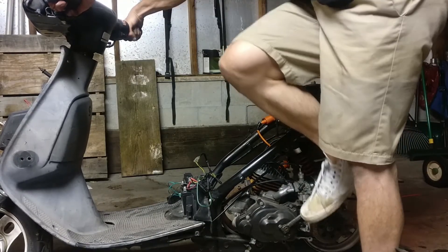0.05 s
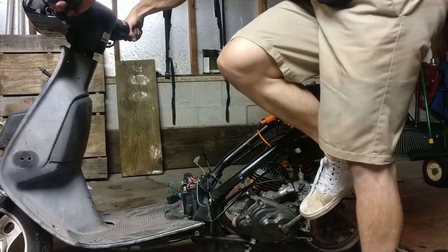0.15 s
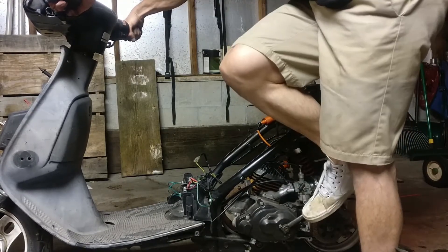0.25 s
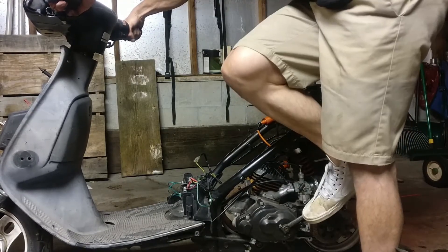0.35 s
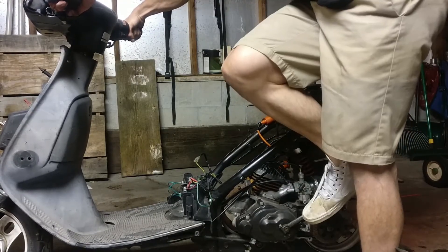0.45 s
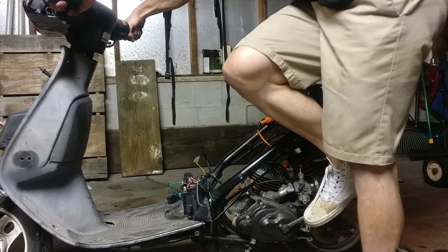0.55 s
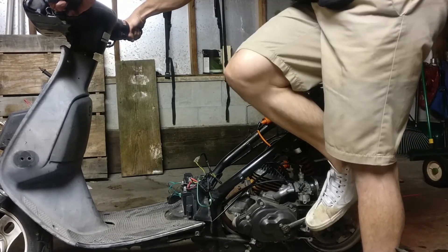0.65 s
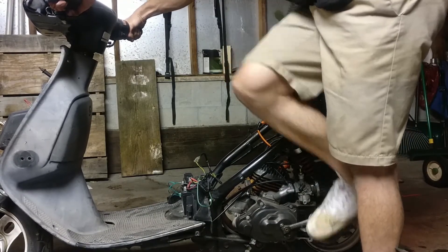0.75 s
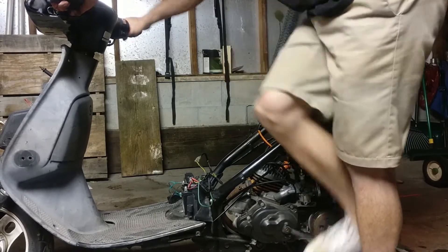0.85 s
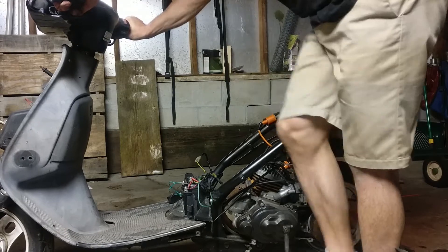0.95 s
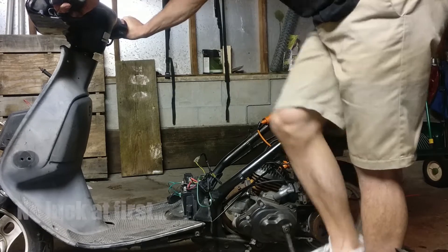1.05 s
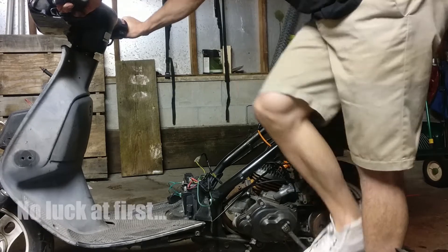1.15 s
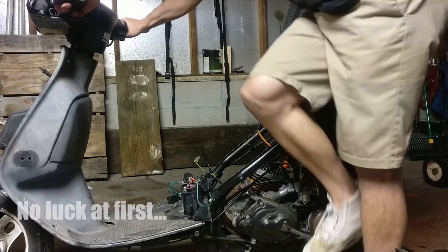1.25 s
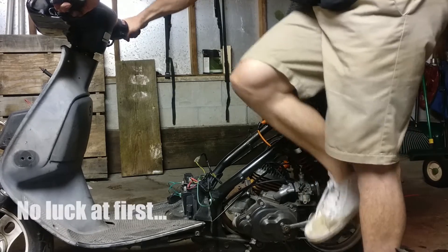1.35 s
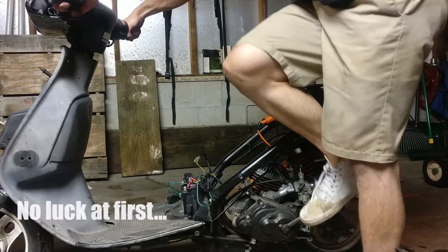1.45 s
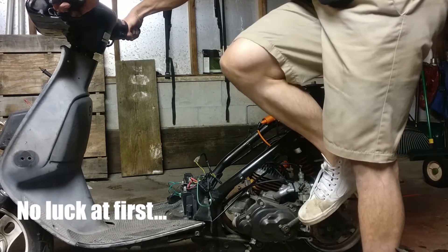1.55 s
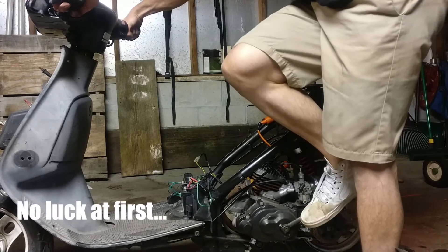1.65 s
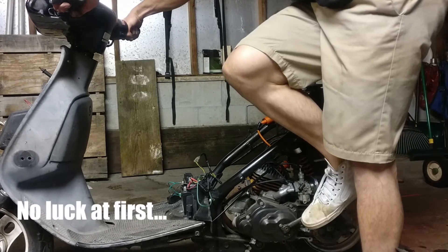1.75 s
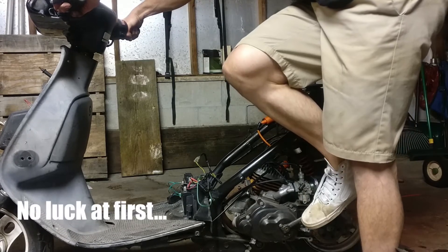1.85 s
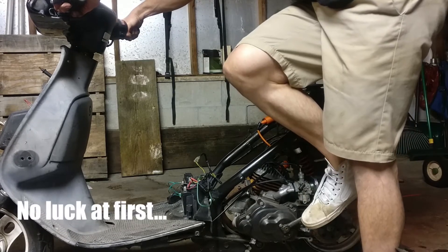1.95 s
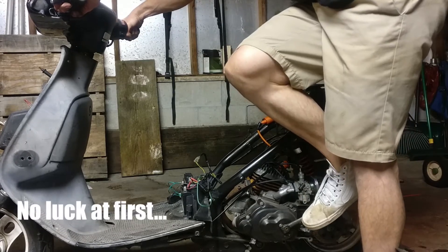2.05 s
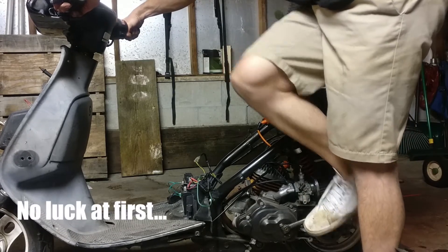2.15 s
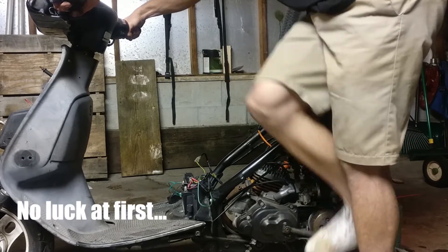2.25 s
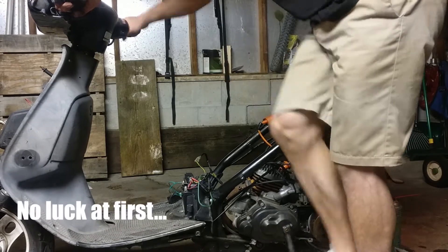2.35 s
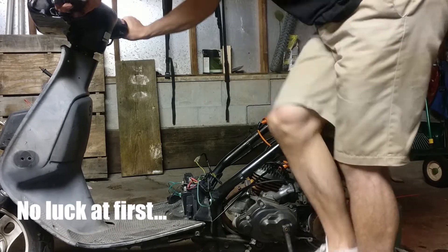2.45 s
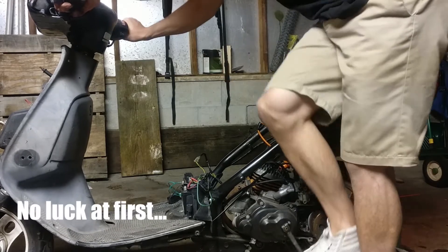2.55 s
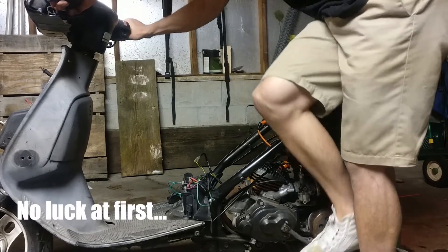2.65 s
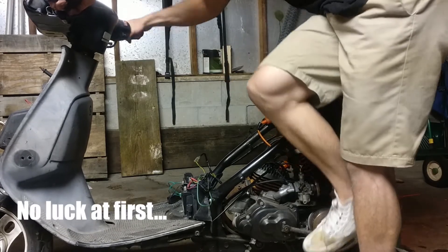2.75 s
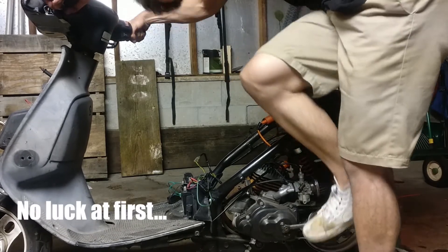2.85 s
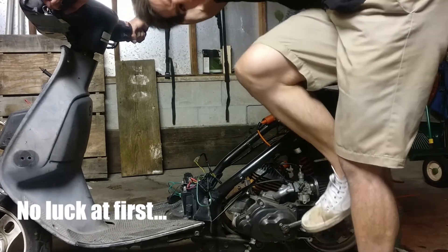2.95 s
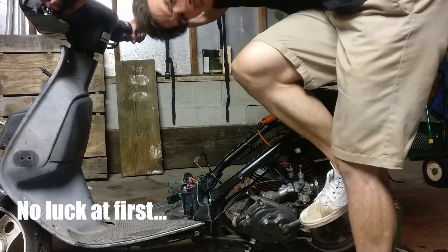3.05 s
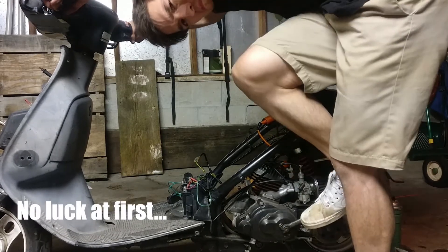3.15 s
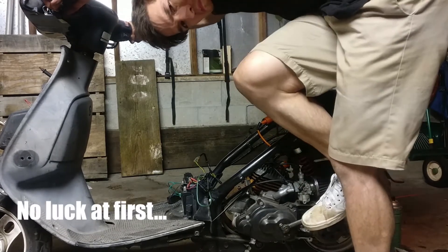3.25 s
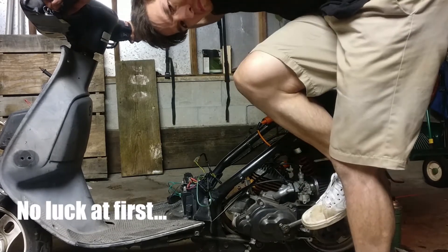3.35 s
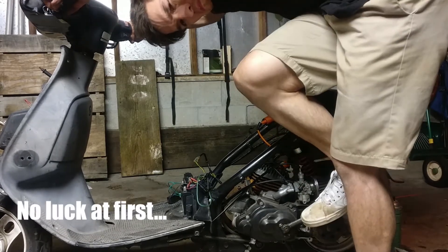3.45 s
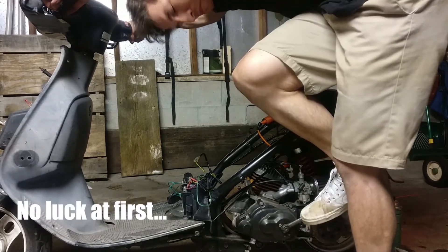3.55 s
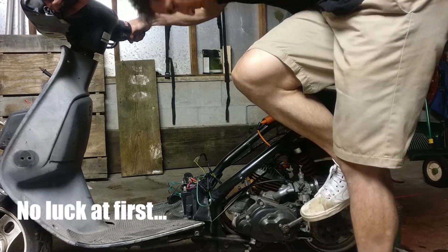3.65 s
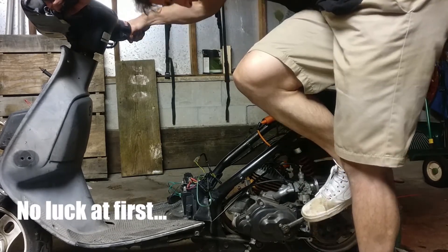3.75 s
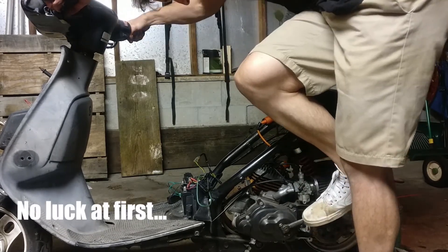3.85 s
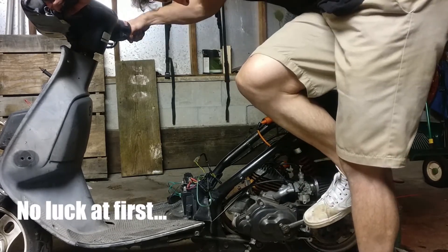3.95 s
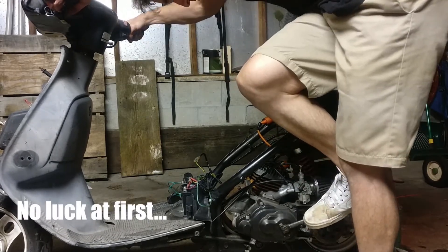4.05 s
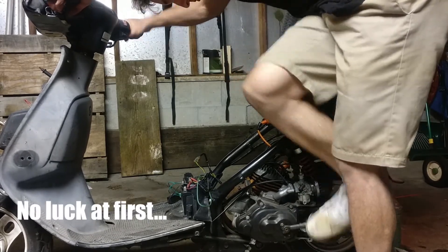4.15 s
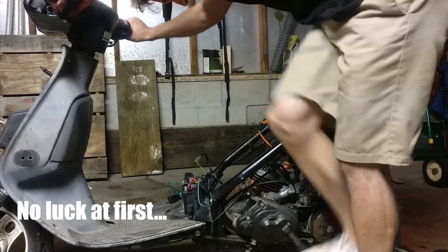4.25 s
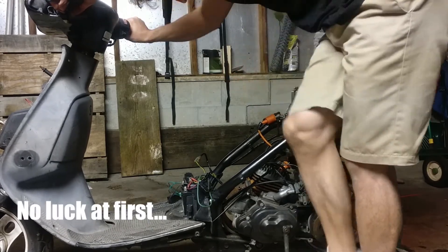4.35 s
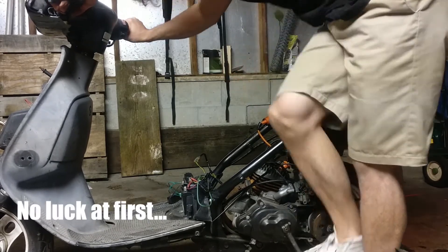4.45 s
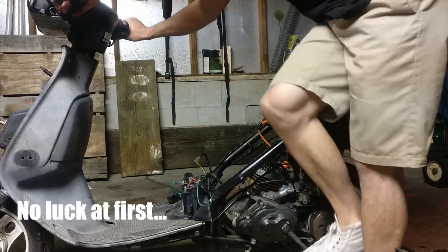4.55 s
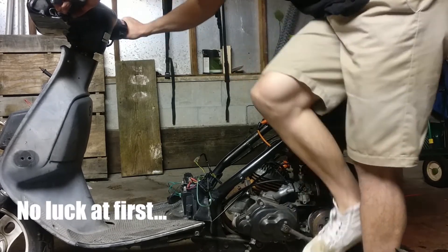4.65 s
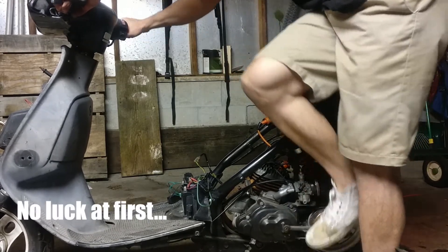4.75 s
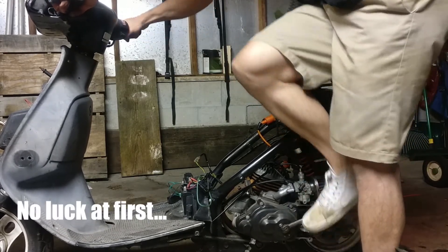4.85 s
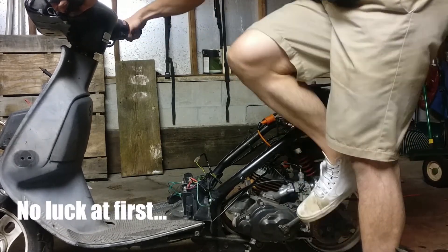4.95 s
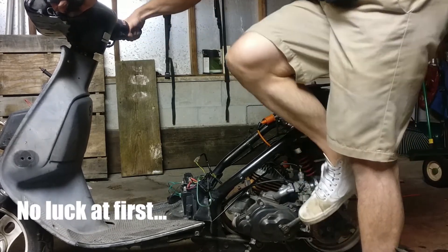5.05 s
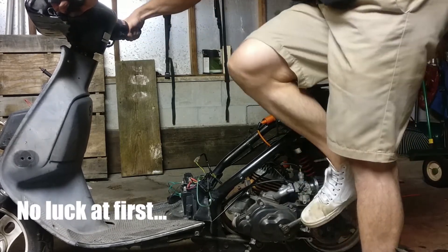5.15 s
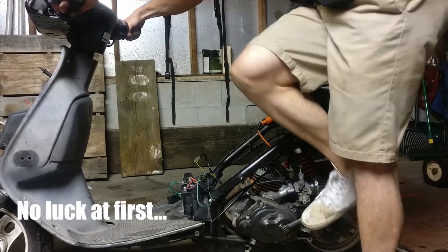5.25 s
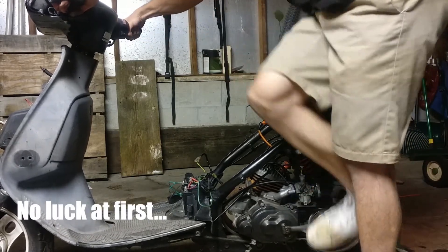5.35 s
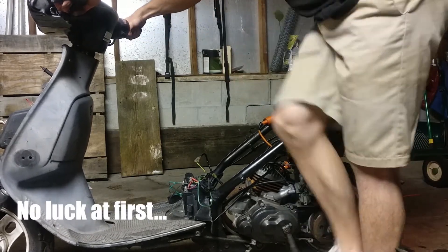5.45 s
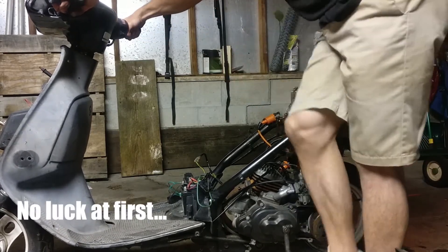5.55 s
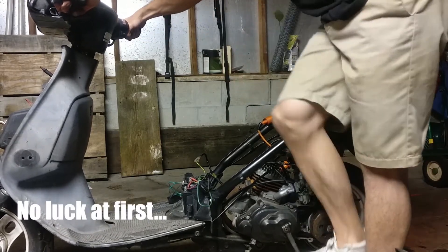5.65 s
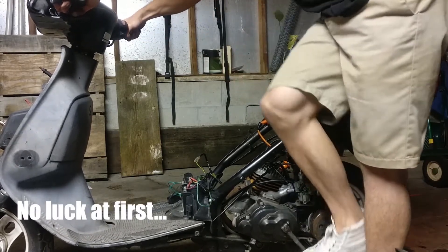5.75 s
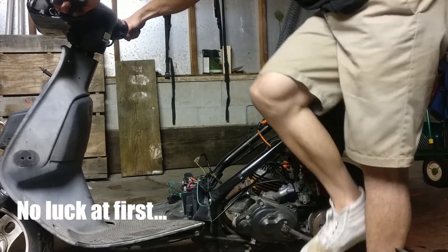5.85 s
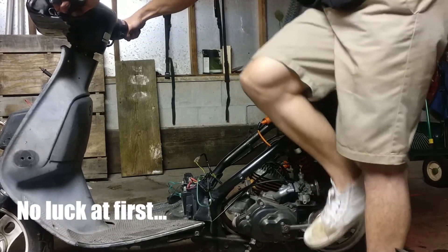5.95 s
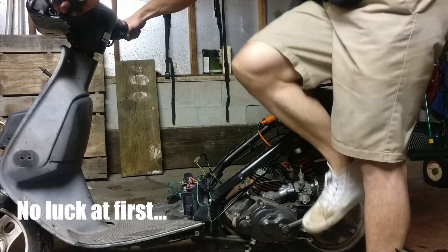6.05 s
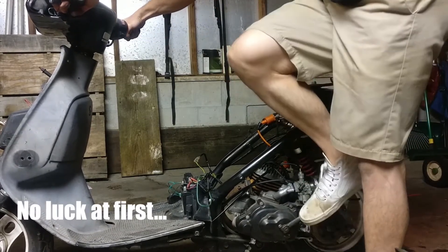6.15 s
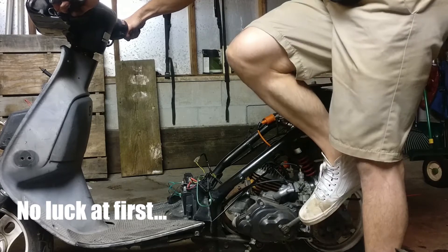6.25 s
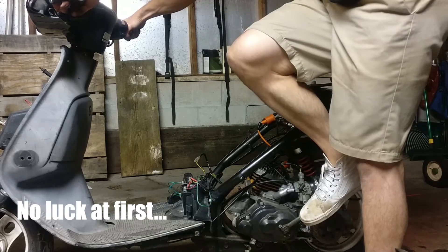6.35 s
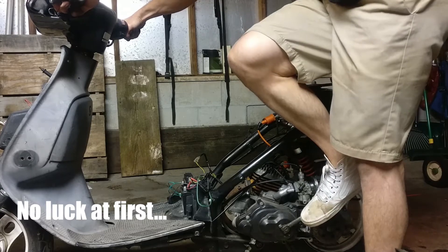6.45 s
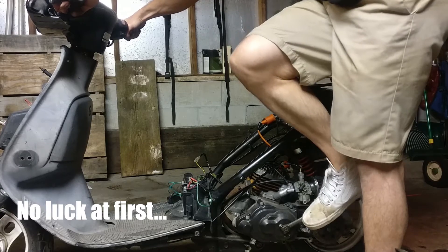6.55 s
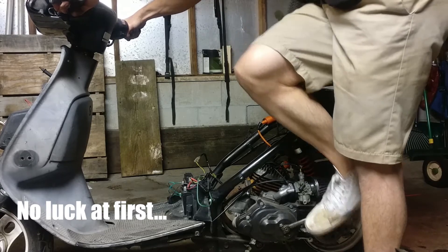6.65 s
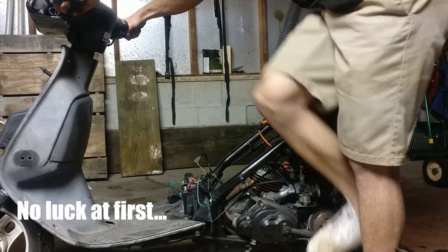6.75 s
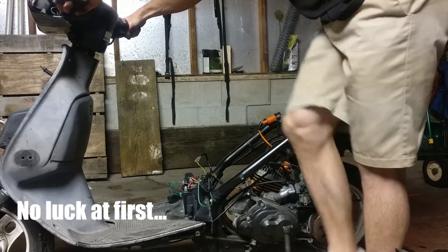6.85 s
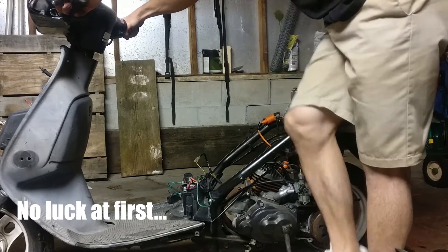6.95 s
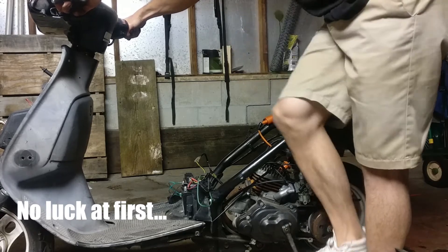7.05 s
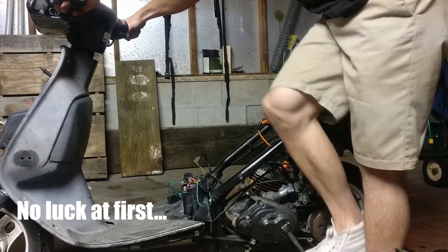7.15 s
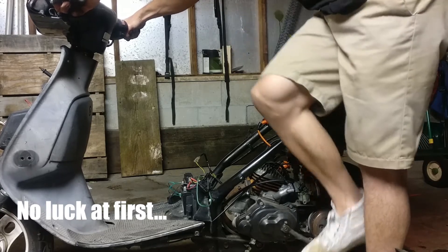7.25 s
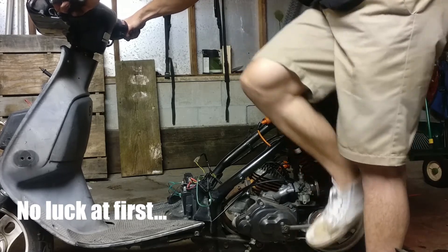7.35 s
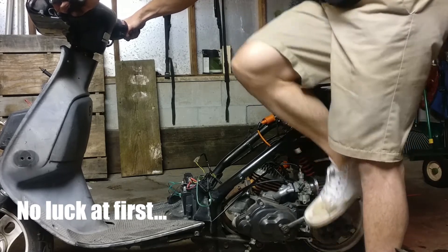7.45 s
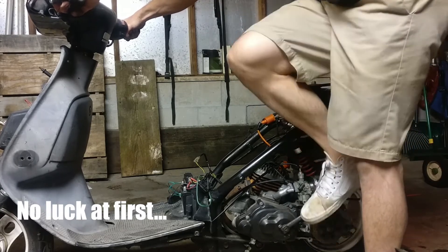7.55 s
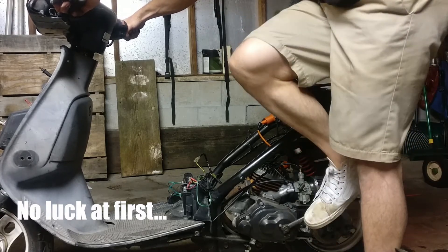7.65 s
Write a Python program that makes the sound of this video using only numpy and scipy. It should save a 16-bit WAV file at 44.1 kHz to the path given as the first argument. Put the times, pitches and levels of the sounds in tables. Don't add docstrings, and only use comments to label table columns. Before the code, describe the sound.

In a block-walled garage, a small scooter is kick-started close to a phone, metal brighter on the left. Low traffic rumble and soft room hush lie underneath. Small pawl clicks and clacks open the scene as the lever is set, with another at 0.65 s. The first kick bites at 0.76: gritty gear scrape, clattering backlash, two deep muffler booms, then a loud clack at 0.97 and a ringing spin-down with a weaker puff. Ratchet ticks and thin spring squeaks follow as the lever rises near 1.3. A sharp clack at 2.1 precedes the second kick at 2.2. From 2.9 to 3.9 it is quiet, with only faint fumbling clicks. Further kicks come at 4.2, 5.3 and 6.7, each scraping, thumping and clacking to a stop without catching. Creaks and strong ratchet clicks follow around 7.3; a hard double clack ends it at 7.64.

```python
import sys
import numpy as np
from scipy import signal
from scipy.fft import rfft, irfft, next_fast_len
from scipy.io import wavfile
from scipy.ndimage import uniform_filter1d, map_coordinates

SR = 44100
rng = np.random.default_rng(int(sys.argv[2]) if len(sys.argv) > 2 else 0)


def gain_from_db(level_db):
    decades = np.asarray(level_db, float) / 20
    return 10 ** decades


def generate_wav(sig):
    pcm = np.round(np.clip(np.atleast_2d(sig).T, -1, 1) * 32767).astype(np.int16)
    wavfile.write(sys.argv[1], SR, pcm)


N = 339129

# hz, width_hz, level_db
CASE_MODES = [(516, 470, 2), (666, 450, 8.5), (1129.7, 40, 17), (1244, 504, 9), (1760, 1400, -3.5)]
# start_s, peak_db, knock_db, down_load_db, case_shake_db
BITES = [
    (0.7633, -21, -7.5, 0, -1),
    (2.2046, -24, -16, 1, -2.5),
    (4.1812, -22.5, -11.5, 1, -1),
    (5.3251, -20, -6, -0.5, -3),
    (6.736, -21.5, -9.5, 1.5, -5.5),
]
# start_s, peak_db, rattle_db, coasting_db, braking_factor
STOPS = [
    (0.9668, -16, -4.5, -0.5, 0.96),
    (2.4034, -21, -1.5, -0.5, 0.86),
    (4.372, -18.5, -12, -1.5, 1.06),
    (5.564, -21.5, -10.5, -7.5, 0.78),
    (6.9155, -15, -3, 1, 0.78),
]


def unit(x):
    return x / np.sqrt(np.mean(x ** 2) + 1e-20)


def along(points, hz):
    f, v = np.transpose(points)
    return np.interp(np.log(hz + 1), np.log(f + 1), v)


def curves(rows):
    s, *cols = np.transpose(rows)
    return [np.interp(np.arange(N) / SR, s, c) for c in cols]


def wobble(rate_hz):
    knots = rng.standard_normal(int(N * rate_hz / SR) + 4)
    return map_coordinates(knots, [np.arange(N) * rate_hz / SR])


def filtered(x, response):
    m = next_fast_len(x.shape[-1] + 4096)
    return irfft(rfft(x, m) * response(np.fft.rfftfreq(m, 1 / SR)), m)[..., :x.shape[-1]]


def body(x, modes):
    def response(f):
        total = 0
        for k, (hz, width_hz, db) in enumerate(modes):
            damping = 1j * f * width_hz
            total = total + (-1) ** k * gain_from_db(db) * damping / (hz * hz - f * f + damping)
        return total
    return filtered(x, response)


def coloured(x, spectrum):
    return unit(filtered(x, lambda hz: gain_from_db(along(spectrum, hz))))


def clacks():
    # hz, width_hz, level_db
    steel_modes = [(2536, 410, 0.5), (3090, 800, 0.5), (4042, 420, -1), (4336, 173, 1), (4764, 250, -2),
                   (2680, 383, 2.5), (4704, 670, -9)]
    steel_low_hz, steel_top_hz, snap_hz = 1630, 5460, 7600
    out, t = np.zeros((2, N + SR)), np.arange(SR // 6) / SR
    chatter_t60_s = np.array([[[.012], [.045]], [[.018], [.035]], [[.05], [.09]]])
    steel_only = np.array([[[1]], [[0]], [[0]]])
    rattling = gain_from_db(-60 * t / np.array([[.2], [.35], [.3]]))
    touch = 1 + 1.18 * np.exp(-t / .002)
    wide = np.array([[1], [3.4], [3.4]])
    modes = steel_modes
    for s, db, bright_db, knock_db, upper_db, rattle_db, tooth, away_db, hold_s in contacts():
        fading = gain_from_db(-60 * np.maximum(t - hold_s * steel_only, 0) / chatter_t60_s)
        chatter = rng.standard_normal((3, 2, len(t))) * fading * touch
        chatter[0, 0, 0] += 6.7
        rattle = gain_from_db(rattle_db) * rattling * rng.standard_normal((3, len(t)))
        struck = []
        for hz, width_hz, level_db in modes:
            detune, level_scatter_db = rng.standard_normal(2)
            mode_db = level_db + level_scatter_db + (upper_db + 9.0) * (hz > 3000)
            struck.append((hz * np.exp(detune / 60), width_hz * wide, mode_db))
        ordered = sorted(struck + tooth, key=lambda mode: mode[0])
        steel = body(np.vstack([chatter[0], rattle[:1]]), ordered)
        steel = filtered(steel[:2] + steel[2],
                         lambda hz: (hz / (hz - 1j * steel_low_hz)) ** 4 / (1 + 1j * hz / steel_top_hz) ** 2)
        snap = filtered(chatter[1] + rattle[1], lambda hz: (hz / (hz - 1j * snap_hz)) ** 3)
        knock = body(chatter[2] + rattle[2], CASE_MODES)
        parts = zip((steel, snap, knock), (1.5, bright_db + 13, knock_db + 3.5))
        clack = sum(gain_from_db(db + rel_db) * p / np.abs(p[0]).max() for p, rel_db in parts)
        out[:, round(s * SR):][:, :len(t)] += gain_from_db([[0], [away_db]]) * clack
    return out[:, :N]


def contacts():
    # start_s, peak_db, bright_db
    slaps = [(0.839, -26, -20), (0.849, -24, -26), (0.889, -24, -22), (0.9148, -22.5, -20),
             (1.004, -19, -36), (1.131, -22.5, -31.5), (2.2257, -27.5, -13), (2.2514, -22.5, -8),
             (2.2829, -20.5, -13), (2.316, -30, -21), (2.3349, -21.5, -7), (2.3746, -21.5, -18),
             (2.392, -28, -17), (2.5731, -33, -30), (4.23, -25.5, -27), (4.238, -35, -25),
             (4.263, -26, -20), (4.2807, -29, -8), (4.3047, -21.5, -9), (4.311, -27, -10),
             (4.346, -19, -12.5), (5.383, -36, -25), (5.3936, -27, -6), (5.4059, -23, -19),
             (5.4415, -24, -20), (5.449, -24, -13), (5.482, -20.5, -15), (5.509, -25.5, -12),
             (5.578, -23, -25), (5.692, -29.5, -25), (6.785, -37, -15), (6.812, -27.5, -14),
             (6.8271, -24, -12), (6.88, -23.5, -11.5), (6.906, -37, -20)]
    # start_s, peak_db, tooth_hz, bright_db
    ratchet = [(1.233, -34, 4700, -38), (1.262, -32.5, 5140, -46), (1.2836, -28.5, 3060, -44),
               (1.303, -32, 5270, -18), (1.32, -30, 3210, -40), (1.3488, -28.5, 3950, -47),
               (1.414, -43, 2940, -34), (2.6737, -28, 2680, -34), (2.746, -39, 2530, -40),
               (2.7848, -38.5, 2600, -38), (2.796, -44.5, 4460, -7), (2.871, -45, 4110, -30),
               (2.9125, -60, 3300, -23), (4.143, -49, 4640, -3), (4.6417, -37, 2640, -40),
               (4.6738, -35, 2570, -23), (4.713, -34.5, 4240, -47), (4.744, -33, 2740, -43),
               (4.77, -33.5, 3380, -38), (4.798, -33.5, 4000, -28), (4.8255, -33.5, 2630, -43),
               (5.807, -41, 4130, -40), (5.852, -37, 4230, -38.5), (5.862, -48, 3300, -25),
               (5.879, -31.5, 5460, -35), (5.905, -33.5, 3800, -38), (5.93, -42, 3100, -40),
               (5.9527, -37, 3500, -40), (5.983, -46, 3620, -33), (6.106, -46, 2900, -49),
               (7.181, -36, 2960, -30), (7.223, -29.5, 3000, -42), (7.262, -22.5, 3100, -36),
               (7.292, -33, 4550, -39), (7.3192, -21, 3100, -24), (7.363, -28, 3450, -24),
               (7.4142, -36, 3700, -40), (7.4857, -42, 3480, -42)]
    # start_s, peak_db, bright_db, knock_db, rattle_db
    seats = [(0.06, -31.5, -22, -14.5, 6), (0.2327, -21.5, -26, -13.5, -34),
             (0.6506, -22.5, -24, -19.5, -5.5), (1.599, -24.5, -33, -19, -4.5),
             (2.1069, -15.5, -29, -42, -13.5), (3.8527, -28.5, -36, -10.5, -32), (3.927, -24, -29, -28, -9),
             (5.1128, -18.5, -30, -14.5, -33), (5.1588, -22, -26, -13.5, -40),
             (6.553, -26.5, -38, -11.5, -33), (6.587, -23.5, -25, -16, -25), (7.6353, -16.5, -21, -22, -9),
             (7.6478, -20, -20, -29, -25)]
    # start_s, peak_db, bright_db, knock_db
    feeling = [(0.071, -44.5, 1.5, -23), (0.198, -40, -30, -20), (0.215, -32, -4, -23),
               (0.6013, -45, -30, -8), (1.5637, -39, -36, -30), (1.5792, -30, -6.5, -43),
               (2.085, -37.5, -38, -35), (3.148, -44, -18, -25), (3.1625, -35.5, -7, -14),
               (3.2183, -41, -31, -3.5), (3.3962, -41, -31, -21), (3.4171, -42, -2.5, -14),
               (3.4798, -49, -26, -1), (3.578, -58, 0, -20), (3.7632, -37, -37, -33),
               (3.779, -37.5, -5.5, -14), (5.068, -35, -5, -33), (6.418, -45, 0, -12),
               (7.593, -30.5, -31, -18), (7.6049, -28.5, -7, -12)]
    brief_s, hold_s = 0.0028, 0.0049
    seat_away_db = -2

    def scatter(*colour_db):
        return np.array(colour_db) + rng.standard_normal(len(colour_db))

    rows = []
    for row in slaps:
        rows.append((*row, *scatter(-11.5, -21.5, -10), [], 0, brief_s))
    for s, db, hz, bright_db in ratchet:
        tooth = [(hz, 420, -2.5)]
        rows.append((s, db, bright_db, *scatter(-11, -22.5, -6), tooth, -4.5, brief_s))
    for s, db, knock_db, *_ in BITES:
        rows.append((s, db, -13.5, knock_db, -21.5, -24, [], 0, brief_s))
    for s, db, rattle_db, *_ in STOPS:
        rows.append((s, db, -6.5, -17, -2, rattle_db, [], 0, hold_s))
    for *row, rattle_db in seats:
        rows.append((*row, -23, rattle_db, [], seat_away_db, hold_s))
    for row in feeling:
        rows.append((*row, -24, -39, [], seat_away_db, brief_s))
    return rows


def spin():
    # hz, width_hz, level_db
    cover_modes = [(1546, 950, -5.5), (2510, 290, 1), (3100, 178, 1), (3800, 860, -1.5), (4240, 900, -2),
                   (5320, 760, -4), (5620, 4500, -15)]
    # hz, width_hz, level_db
    frame_modes = [(159, 114, -2.5), (186, 14, 8.5), (242.7, 5.5, -3), (318.2, 75, -7.5), (400, 77, -11.5),
                   (620, 240, -9)]
    # hz, density_db
    air_spectrum = [(3240, 15.5), (5500, 7), (7730, 4), (14500, 13.5), (16100, 10.5), (16300, -17),
                    (16500, -53)]
    # middle_s, half_length_s, level_db
    compression = [(0.88, 0.023, 7.5), (0.953, 0.014, -5), (1.167, 0.039, 13), (2.47, 0.044, 1),
                   (2.605, 0.062, -6), (4.214, 0.024, -4), (4.45, 0.098, 0.5), (4.591, 0.041, -21),
                   (5.36, 0.031, -21), (5.45, 0.12, 9.5), (5.73, 0.064, 10.5), (6.903, 0.016, -13),
                   (7.11, 0.076, 9)]
    gear_db = effort_db(-43.5, -31, -28, 0.058, 176, 0, (0, 0))
    case_db = effort_db(-48, -48.5, -37, 0.022, 140, 0.47, (0.48, 0))
    air_db = effort_db(-45.5, -53, -45, 0.13, 240, -13.5, (0, 1))
    thrum_db = effort_db(-42, -31.5, -35, 0.084, 160, -3, (1, 0))
    t = np.arange(N) / SR
    pressure_db = sum(db * np.exp(-((t - s) / half_s) ** 2) for s, half_s, db in compression)
    shake = np.tanh(wobble(35)) + 1.13 * wobble(13)

    meshing = unit(body(grit(2500, spread_db=3, smooth=0.56, patchy_db=3.0), cover_modes))
    gears = gain_from_db(gear_db - 2.5 + 0.56 * shake) * teeth(330, 0.014, 1.76) * meshing
    rubbing = unit(body(grit(900, spread_db=10.5, smooth=0.79, patchy_db=3.0), CASE_MODES))
    case = gain_from_db(case_db + 2.0 + 0.72 * wobble(25)) * rubbing
    leak = coloured(grit(4000, spread_db=4, smooth=0.64, patchy_db=4), air_spectrum)
    air = gain_from_db(air_db + pressure_db + 3.0 + shake) * teeth(270, 0.016, 1.3) * leak
    shaking = unit(body(rng.standard_normal(N), frame_modes))
    thrum = gain_from_db(thrum_db + 1.0 + 3.05 * wobble(20)) * shaking
    return gears + case + air + thrum


def effort_db(bite_db, down_db, jolt_db, hold_s, fall_db_per_s, drag_db, feels):
    # middle_s, half_length_s, scrape_db, case_weight_db, hiss_db
    drags = [(0.0, 0.11, -57, -3, -10), (0.09, 0.021, -46, -9, -9), (0.27, 0.022, -64, -9, -15),
             (0.2, 0.099, -57, -10, -13), (1.301, 0.12, -45.5, -5.5, -3), (1.66, 0.037, -65, 1, 2),
             (2.14, 0.032, -44.5, -6, -13), (2.68, 0.08, -47.5, -4.5, 5), (2.82, 0.032, -57.5, 12, 11),
             (2.925, 0.028, -60.5, 1, 23.5), (3.97, 0.03, -72, -14, 0), (3.902, 0.63, -67, -2, -7),
             (4.75, 0.11, -50, -2.5, 0), (5.167, 0.1, -66.5, 10.5, -10), (5.92, 0.091, -44.5, -21, -3),
             (6.2, 0.2, -81, 10, -7), (6.62, 0.12, -65.5, 4, -4), (7.35, 0.1, -42.5, -10.5, -15),
             (7.68, 0.044, -38, -11.5, -15)]
    t, take_up_s = np.arange(N) / SR, 0.018
    gain = gain_from_db(drag_db) * swells(drags, feels) + 1e-6
    for (bite_s, _, _, load_db, case_db), (stop_s, _, _, coast_db, braking) in zip(BITES, STOPS):
        down = np.interp(t, [bite_s, stop_s], [bite_db, down_db]) + load_db
        after = jolt_db + coast_db - braking * fall_db_per_s * np.maximum(t - stop_s - hold_s, 0)
        level_db = np.where(t < stop_s, down, after) + feels[0] * case_db
        gain = gain + gain_from_db(level_db) * np.clip((t - bite_s) / take_up_s, 0, 1)
    return 20 * np.log10(gain)


def swells(rows, feels):
    t, gain = np.arange(N) / SR, 0
    for s, half_s, db, *extra_db in rows:
        gain = gain + gain_from_db(db + np.dot(feels, extra_db)) * np.exp(-((t - s) / half_s) ** 2)
    return gain


def grit(rate_hz, spread_db, smooth, patchy_db):
    size_db = spread_db * np.minimum(rng.exponential(size=N), 3)
    ticks = (rng.random(N) < rate_hz / SR) * gain_from_db(size_db) * rng.choice([-1, 1], N)
    z = signal.stft(unit(ticks) + smooth * rng.standard_normal(N), nperseg=256)[2]
    field = uniform_filter1d(rng.standard_normal(z.shape), size=3, axis=0)
    field = uniform_filter1d(field, size=6, axis=1)
    return signal.istft(z * gain_from_db(patchy_db * unit(field)), nperseg=256)[1][:N]


def teeth(rate_hz, t60_s, depth):
    strokes = (rng.random(N) < rate_hz / SR) * gain_from_db(4 * np.tanh(rng.standard_normal(N)))
    decay = gain_from_db(-60 * np.arange(SR // 20) / SR / t60_s)
    return unit(1 + depth * signal.fftconvolve(strokes, decay)[:N])


def exhaust():
    # start_s, peak_db, bark_db, bark_hz
    puffs = [(0.856, -10.5, 0.5, 186), (0.927, -13, -2, 216.3), (1.032, -16, -2, 223),
             (1.177, -30, -8, 260), (2.307, -9, -12, 173), (2.39, -14, -1, 174.4), (2.478, -37, -17, 193),
             (2.546, -26.5, 4.5, 234.5), (4.287, -10, -0.5, 186), (4.359, -13.5, 0, 173.5),
             (4.438, -25, -3, 264), (4.52, -22, 1.5, 223), (5.41, -9.5, -13, 186), (5.497, -11, -9.5, 186),
             (5.598, -17, -15, 186), (5.751, -42, -2, 186), (6.822, -8, -14, 186), (6.888, -11, -12, 184),
             (6.99, -14, -34, 194), (7.131, -23, -31, 190)]
    # hz, width_hz, level_db
    pipe_modes = [(186, 6.4, 18), (240, 6.2, -5), (386, 11, -1.5), (665, 250, -13.5)]
    boom_hz, rise_s = 90, .019
    out, t = np.zeros(N + SR), np.arange(SR // 3) / SR

    def ring(ratio, t60_s):
        return gain_from_db(-60 * t / t60_s) * np.sin(2 * np.pi * ratio * boom_hz * t)

    boom = t / rise_s * np.exp(1 - t / rise_s) * np.sin(2 * np.pi * boom_hz * t)
    boom += .1 * ring(.87, .35) + .12 * ring(1.17, .45)
    pulse = t / .001 * np.exp(-t / 0.0022)
    for s, db, bark_db, bark_hz in puffs:
        bark = body(pulse, [(bark_hz, 14, 0), (bark_hz * 1.023, 60, -5)] + pipe_modes[2:])
        out[round(s * SR):][:len(t)] += gain_from_db(db - 1.0) * (boom + gain_from_db(bark_db) * bark / np.abs(bark).max())
    return out[:N]


def creak():
    # middle_s, half_length_s, level_db, pitch_hz
    squeaks = [(1.227, 0.013, -42, 1756), (1.302, 0.013, -34, 1770), (1.346, 0.033, -40, 1717),
               (5.875, 0.012, -39, 1750), (5.908, 0.0053, -35, 1790), (5.93, 0.018, -45, 1760),
               (5.975, 0.017, -38.5, 1792), (6.02, 0.011, -44.5, 1836), (6.065, 0.013, -58.5, 1780),
               (7.293, 0.022, -39.5, 1660), (7.357, 0.036, -36.5, 1780), (7.403, 0.029, -39, 1730),
               (7.465, 0.023, -57, 1760)]
    # middle_s, level_db, length_s
    shell = [
        (1.014, -32.5, 0.087),
        (2.448, -26, 0.052),
        (2.568, -40, 0.08),
        (4.442, -40.5, 0.055),
        (5.547, -28, 0.03),
        (6.965, -31, 0.057),
    ]
    # middle_s, half_length_s, level_db, pitch_hz, width_hz
    groans = [(0.145, 0.044, -47.5, 576, 100), (0.271, 0.047, -44.5, 1395, 62),
              (0.274, 0.043, -51.5, 716, 120), (.33, 0.02, -56, 1420, 100), (1.002, 0.19, -38.5, 256, 11),
              (1.18, 0.041, -43, 1163, 18), (1.624, 0.032, -48, 1380, 82), (1.63, 0.033, -51.5, 503, 79),
              (1.688, 0.023, -58, 1330, 79), (2.75, 0.039, -50, 610, 140), (2.956, 0.036, -48, 246, 22),
              (4.421, 0.17, -33, 244.9, 11), (4.719, 0.063, -54, 235, 9.4),
              (5.148, 0.026, -39.5, 1104, 100), (5.363, 0.036, -38, 694, 170), (5.482, 0.029, -30, 577, 61),
              (5.542, 0.028, -50, 600, 100), (5.937, 0.025, -49, 690, 47), (6.002, 0.19, -56.5, 500, 53),
              (6.868, 0.024, -33.5, 620, 190), (7.236, 0.046, -44.5, 1103, 25),
              (7.36, 0.04, -39.5, 1117, 17), (7.361, 0.012, -41, 5310, 100)]
    out, t = np.zeros(N + SR), np.arange(-SR // 4, SR // 4) / SR
    rows = [(*row, 10) for row in squeaks]
    rows += [(s, length_s / 2, db, 1147, 15) for s, db, length_s in shell]
    for s, half_s, db, hz, width_hz in rows + groans:
        noise = rng.standard_normal(len(t))
        if width_hz < 40:
            drift = np.cumsum(noise) * np.sqrt(2 * np.pi * width_hz / SR)
            note = np.sin(2 * np.pi * hz * t + drift)
            tone = note + .7 * unit(body(noise, [(hz, 4 * width_hz, 0)]))
        else:
            tone = body(noise, [(hz, width_hz, 0)])
        swell = np.exp(-(t / half_s) ** 2)
        loudness = np.sqrt(np.mean((tone * unit(swell)) ** 2))
        out[round(s * SR):][:len(t)] += gain_from_db(db) * swell * tone / loudness
    return out[SR // 4:][:N] * gain_from_db(2.5 * np.tanh(wobble(60)))


def ports(x):
    # hz, left_over_right_db
    facing = [(100, 0), (700, -4), (1300, 10.5), (2400, 11), (4400, 21.5), (8100, 44), (15000, 27)]
    lead_s = 12 / 44100

    def response(hz):
        share = gain_from_db(along(facing, hz))
        late = np.exp(-2j * np.pi * hz * lead_s)
        return 2 * np.array([share, late]) / (1 + share)
    return filtered(x, response)


def diffuse(pair):
    # hz, left_right_correlation
    alike = [(90, .99), (180, 0.9), (290, 0.64), (640, 0.16), (1400, -0.17), (3000, 0.14)]

    def response(hz):
        turn = np.arccos(np.clip(along(alike, hz), -1, 1)) / 2
        return np.array([np.cos(turn), np.sin(turn)])
    mid, side = filtered(pair, response)
    return np.array([mid + side, mid - side])


def garage(x):
    # hz, t60_s
    walls = [(100, 0.46), (500, 0.54), (2500, 0.47), (6000, 0.41), (14000, 0.16)]
    # hz, level_db
    shade = [(1500, 4), (5000, -5.5), (8000, -34), (10500, -36), (15000, -27)]
    gap_s, turn_s = .005, .9
    out, phase = np.zeros((2, N)), np.arange(N) / SR / turn_s
    for k in range(3):
        hz, t, z = signal.stft(rng.standard_normal((2, SR * 2 // 3)), SR, nperseg=256)
        decay = gain_from_db(-60 * t / along(walls, hz)[:, None])
        tail = signal.istft(z * decay, SR, nperseg=256)[1]
        window = (1 + np.cos(2 * np.pi * (phase - k / 3))) / 3
        delayed = np.pad(x * window, (round(gap_s * SR), 0))
        out += signal.fftconvolve(delayed[None], tail / np.linalg.norm(tail[0]), axes=1)[:, :N]
    return filtered(diffuse(out), lambda hz: gain_from_db(along(shade, hz)) ** np.array([[0], [1]]))


def background():
    # time_s, rumble_db, idling_engine_db
    traffic = [(0.0, -55.5, -35), (1.09, -48, -47), (1.33, -53, -44), (5.65, -42.5, -55),
               (5.89, -47.5, -57), (7.07, -44, -48), (7.69, -47.5, -50.5)]
    # hz, density_db
    rumble_spectrum = [(15, -78), (25, -74), (50, -13), (70, 10), (184, -26), (226, -25), (287, -51),
                       (330, -34), (430, -82), (730, -120)]
    # hz, density_db
    hush_spectrum = [(150, -9.5), (250, -3), (288, -13), (454, -11.5), (964, -8), (1390, -12.5),
                     (9250, -36), (15400, -24), (16500, -47)]
    rumble_db, idle_db = curves(traffic)
    rumble_noise = coloured(rng.standard_normal((2, N)), rumble_spectrum)
    rumble = gain_from_db(rumble_db + 12.0 + 0.77 * wobble(7.9)) * rumble_noise
    engine = body(rng.standard_normal((2, N)), [(112.2, 7.2, 0)])
    idle = gain_from_db(idle_db - 3.5) * unit(body(engine, [(120, 72, 0)]))
    hush = gain_from_db(-54.5) * coloured(rng.standard_normal((2, N)), hush_spectrum)
    return diffuse(rumble + idle + hush)


def scene():
    (hits, hits_away), turning, squeaks, booms = clacks(), spin(), creak(), exhaust()
    wet = gain_from_db(1.0) * (hits_away + turning) + gain_from_db(-8) * squeaks + gain_from_db(-11) * booms
    return ports(hits + turning + squeaks + booms) + garage(wet) + background()


def low_pass(x):
    return signal.sosfilt(signal.butter(12, 16990, fs=SR, output="sos"), x)


def record(dry):
    low_hz, top_hz, ceiling = 52, 15850, .75
    cut = filtered(dry, lambda hz: (1j * hz / low_hz) ** 4 / (1 + 1j * hz / low_hz) ** 4
                   / (1 + (hz / top_hz) ** 90))
    rounded = cut / (1 + np.abs(cut / ceiling) ** 4) ** (1 / 4)
    return low_pass(rounded)


dry = scene()
out = record(dry)
generate_wav(out)
```